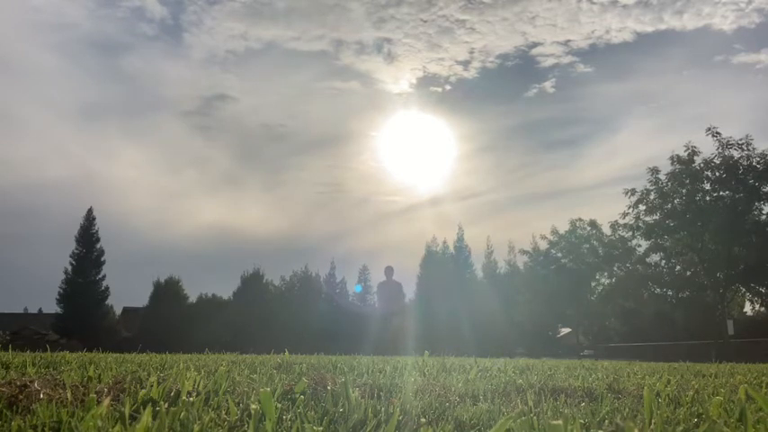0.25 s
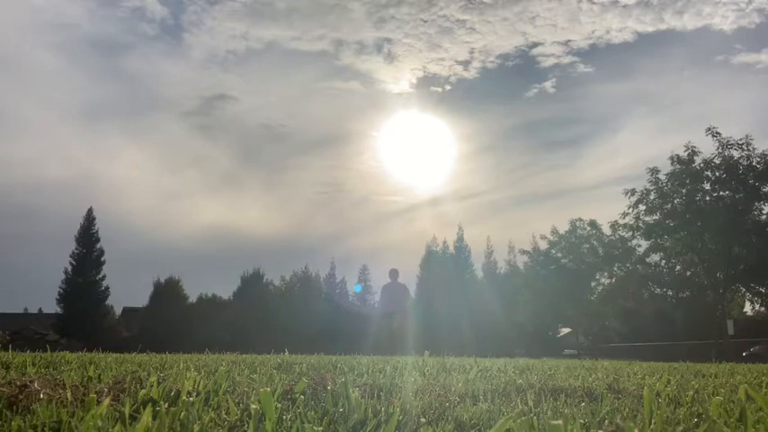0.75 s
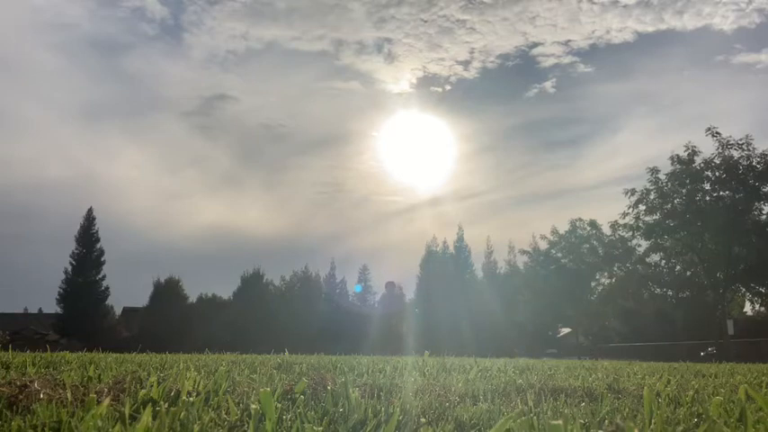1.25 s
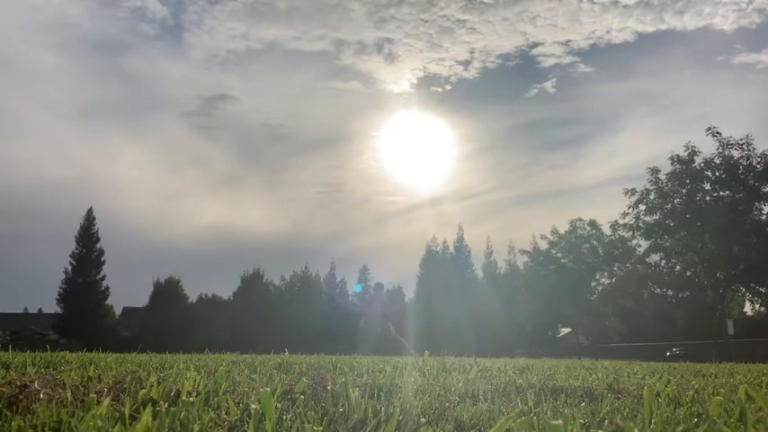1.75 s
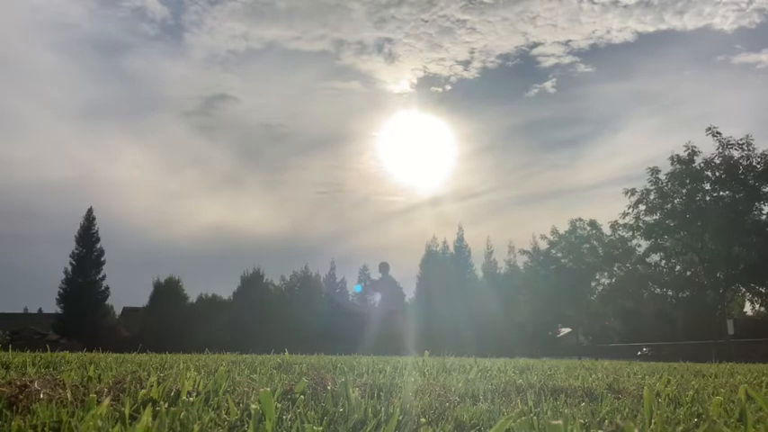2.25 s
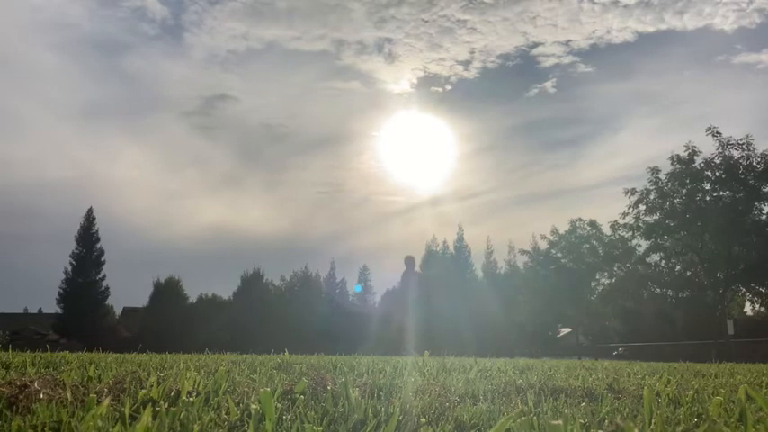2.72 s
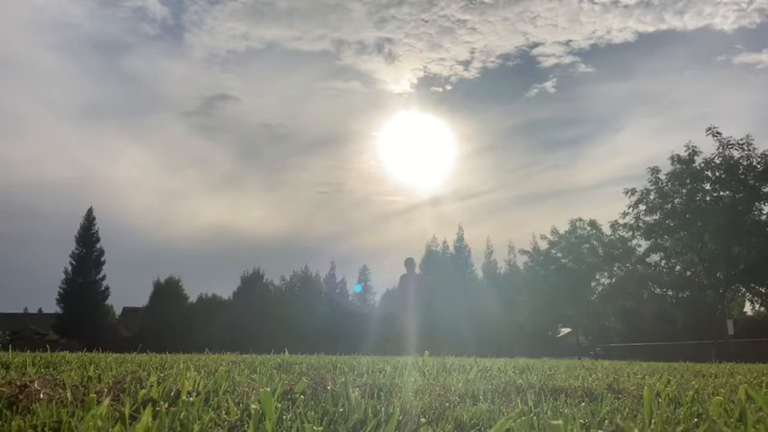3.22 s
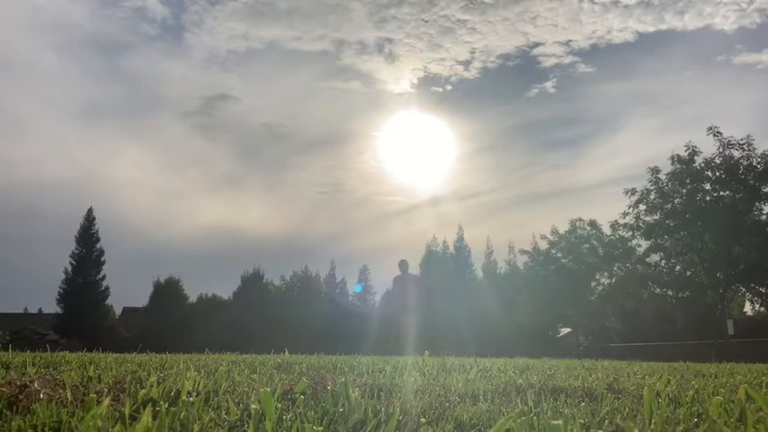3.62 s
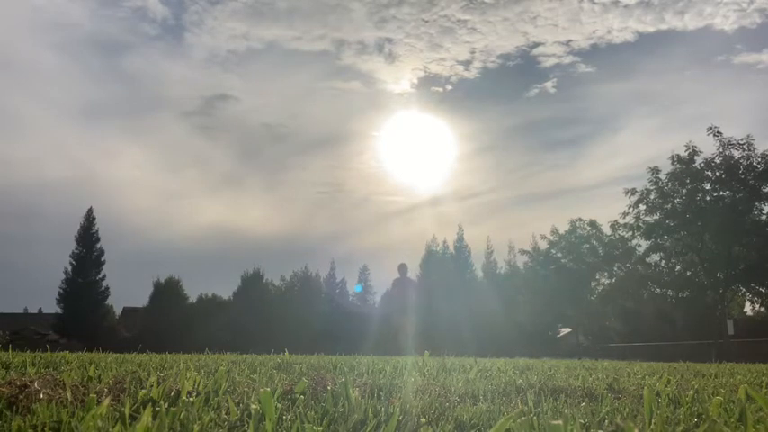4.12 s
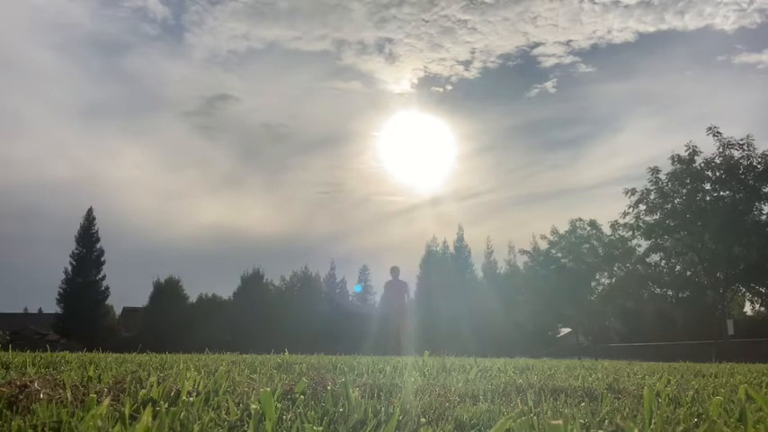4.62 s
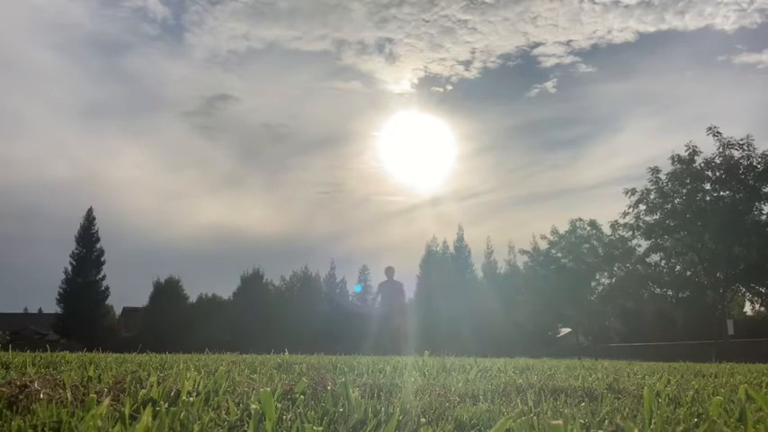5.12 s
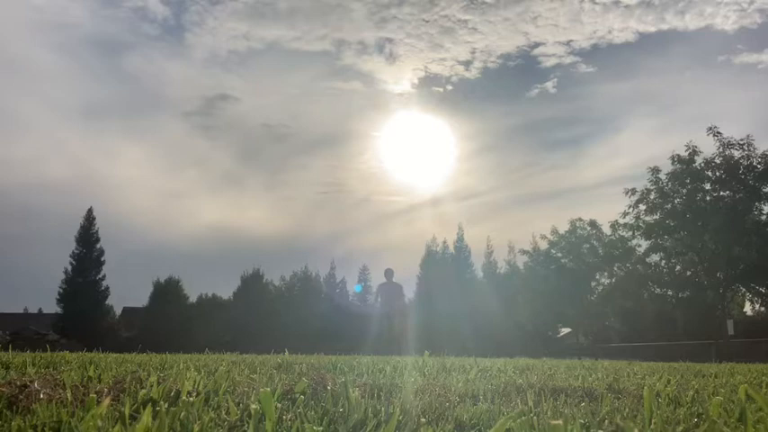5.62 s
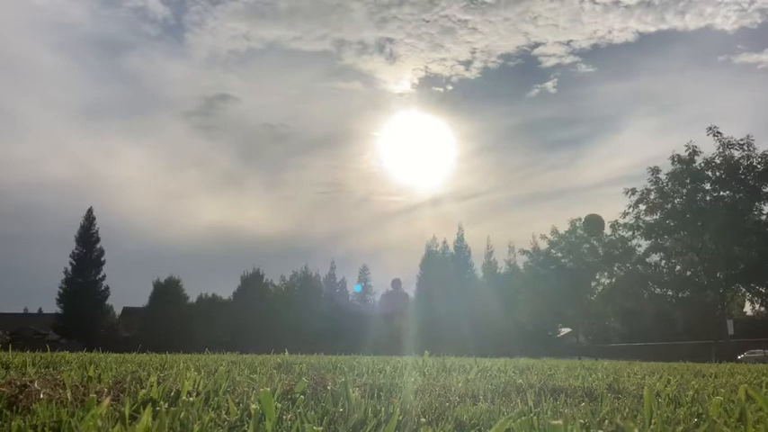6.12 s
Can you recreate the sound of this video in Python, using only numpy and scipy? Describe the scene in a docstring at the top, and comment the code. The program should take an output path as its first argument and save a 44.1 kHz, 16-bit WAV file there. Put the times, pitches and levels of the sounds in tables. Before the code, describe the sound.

Over dull distant traffic and a wavering engine drone, two sharp metallic bat hits ring out, with balls thumping turf and one brushing grass.

```python
"""A lawn edged with trees and houses, heard from down in the grass: a metal bat hits two balls.
Each hit is a noisy crack plus ringing barrel tones, and delayed noise brings it back from trees and walls.
Balls thump on the turf as tones that drop in pitch; one brushes close by as shaped noise with blade snaps.
Distant traffic (dull noise), an engine drone (two wavering tones) and a faint hiss run throughout."""
import sys
import numpy as np
from scipy import signal
from scipy.fft import rfft, irfft
from scipy.io import wavfile

SR = 44100
rng = np.random.default_rng(int(sys.argv[2]) if len(sys.argv) > 2 else 0)


def wav_record(signal):
    """Record a signal, one row per channel, as 16-bit PCM in the file named by sys.argv[1]."""
    frames = np.transpose(np.atleast_2d(signal))
    bounded = np.clip(frames, -1, 1)
    # unit amplitude maps onto the largest positive 16-bit level
    quanta = np.round(bounded * 32767).astype(np.int16)
    wavfile.write(sys.argv[1], SR, quanta)


N = 280917  # length of the scene (samples)
T = np.arange(N) / SR  # time of every sample (s)
BINS = np.fft.rfftfreq(4096, 1 / SR)  # frequencies at which the crack is built (Hz)
HALVES = np.array([[.5], [-.5]])  # splits a left-right difference evenly between the sides


def amp(db):
    """Turns decibels into a gain."""
    return 10 ** (np.asarray(db) / 20)


def unit(x):
    """Scales a sound to an rms of 1."""
    return x / np.sqrt(np.mean(x ** 2) + 1e-20)


def read(points, hz):
    """Reads a curve between its points, along a logarithmic frequency axis."""
    f, value = np.transpose(points)
    return np.interp(np.log(hz + 1), np.log(f + 1), value)


def follow(rows):
    """Reads a curve of time at every sample."""
    return np.interp(T, *np.transpose(rows))


def pan(db):
    """Gives left and right gains for a level difference in dB."""
    return amp(db * HALVES)


def add(mix, s, sound):
    """Adds a sound to the mix at time s, cutting off whatever runs past the end."""
    start = max(round(s * SR), 0)
    part = mix[:, start:][:, :sound.shape[-1]]
    part += sound[..., :part.shape[1]]


def colour(x, points):
    """Makes each frequency louder or softer by a curve in dB."""
    hz = np.fft.rfftfreq(x.shape[-1], 1 / SR)
    return irfft(rfft(x) * amp(read(points, hz)), x.shape[-1])


def causal(db):
    """Builds the minimum-phase response: these gains, with the energy as early as possible."""
    log_gain = np.log(amp(np.r_[db, db[-2:0:-1]]))
    return np.exp(np.conj(signal.hilbert(log_gain)))[:len(db)]


def drift(hz):
    """Makes a random wander of rms 1 that changes at rates up to about hz."""
    f = np.fft.rfftfreq(N, 1 / SR)
    return unit(irfft(rfft(rng.standard_normal(N)) / (1 + (f / hz) ** 4), N))


# How far the left of the two microphone ports leads the right
# (frequency [Hz], lead [radians])
PORT_LEAD = [(20, 0), (140, -.35), (240, -1.4), (600, -2.6), (1500, -3.2), (2500, -6.2), (4000, -6.3),
             (5700, -9.4), (7400, -6.3), (9400, -3.1), (11250, 0), (13100, 3.1), (15000, 6.3), (16000, 7)]


def ports(noise, likeness=.85):
    """Blends two unrelated noises into one sound that reaches two ports with a phase lead on the left."""
    hz = np.fft.rfftfreq(noise.shape[1], 1 / SR)
    a, b = rfft(noise)
    same = np.clip(likeness, 0, 1)
    blend = same * a + np.sqrt(1 - same ** 2) * b
    right = blend * np.exp(-1j * read(PORT_LEAD, hz))
    return irfft([a, right], noise.shape[1])


def hiss(level_db=-85):
    """The microphone's own faint, steady noise, nearly alike on both sides."""
    noise = ports(rng.standard_normal((2, N)), likeness=0.96)
    tone = [(1000, -2.0), (8000, -2.5), (14500, -1.0), (16000, -10.5)]  # (Hz, dB)
    return amp(level_db) * unit(colour(noise, tone))


# Tone of the distant traffic: mostly bass (frequency [Hz], relative level [dB])
RUMBLE_TONE = [(20, -35), (36, -15), (58, -3.5), (90, -3.5), (160, -4.5), (290, -5.5), (480, -6),
               (700, -12), (880, -12.5), (1250, -24), (1600, -32.5), (2100, -48.5), (3600, -52.5),
               (6000, -61), (16000, -78)]
# How alike the traffic is on the left and right (frequency [Hz], likeness [0-1])
RUMBLE_LIKENESS = [(60, 0.96), (130, 0.72), (230, 1), (420, 0.92), (800, 0.81), (1200, 0.5), (1800, 0.05),
                   (4000, 0.075), (8000, 0.731)]
# How much louder the traffic is on the left (frequency [Hz], left-right level [dB])
RUMBLE_LEAN = [(60, 3.5), (120, -1), (220, 5), (400, 1.5), (800, 0.5), (1300, 2), (2600, 0), (6000, -2)]
RUMBLE_DB = -39.5  # middle level, around which the traffic swells


def traffic(swell_db=1.08):
    """Far roads blur into a wide, dull wash of noise, heard differently at the two ports."""
    hz = np.fft.rfftfreq(N, 1 / SR)
    pair = rfft(ports(rng.standard_normal((2, N)), read(RUMBLE_LIKENESS, hz)))
    tone_db = read(RUMBLE_TONE, hz) + read(RUMBLE_LEAN, hz) * HALVES
    wash = unit(irfft(pair * amp(tone_db), N))
    return wash * amp(RUMBLE_DB + swell_db * drift(3.9))


# Engine's firing tone as it drifts in and out, before trim and throb (time [s], level [dB])
DRONE_LEVEL = [(0.0, -49.5), (0.68, -49.5), (0.76, -56.5), (1.44, -39.5), (2.64, -44), (2.8, -54.5),
               (2.96, -42.5), (3.52, -55.5), (3.64, -43.5), (3.8, -51.5), (4.4, -42), (4.6, -44.5),
               (4.68, -53.5), (5.64, -38.5), (5.88, -47.0), (5.96, -38.5), (6.2, -36.0), (6.37, -40)]
# Its third harmonic, before trim and throb (time [s], level [dB])
DRONE_THIRD_LEVEL = [(0.0, -49.0), (1.36, -48.5), (1.56, -58.5), (2.2, -49.5), (2.32, -61.5), (3.32, -52.5),
                     (3.6, -45.0), (4.68, -53.0), (5.48, -49.5), (6.24, -56.5), (6.37, -50.5)]
DRONE_HZ, DRONE_SAG_HZ_PER_S = 78.4, 1.22  # starting pitch and even slowing, before the waver


def engine(firing_db=0.0, third_db=-1.0, waver=.025, throb_db=2):
    """A far engine drones on its firing tone and third harmonic, wavering in the moving air."""
    pitch = (DRONE_HZ - DRONE_SAG_HZ_PER_S * T) * (1 + waver * drift(11))
    turns = np.cumsum(pitch) / SR
    firing_level = amp(follow(DRONE_LEVEL) + firing_db + throb_db * drift(12.0))
    third_level = amp(follow(DRONE_THIRD_LEVEL) + third_db + throb_db * drift(15))
    firing = firing_level * np.sin(2 * np.pi * turns)
    third = third_level * np.sin(2 * np.pi * 3 * turns)
    return np.sqrt(2) * (pan(0.18) * firing + pan(9) * third)  # root 2: levels are rms


BRUSH_START_S, BRUSH_END_S = 3.195, 4.9  # the grass is touched, and is still again
# Levels of the push, before the brush trim and flutter
SLIDE_DB, SLIDE_FALL_DB_PER_S = -36.5, 48  # the push dies away as the ball slows
SHOVE_S, SHOVE_DB, SHOVE_WIDTH_S = 3.256, -33, 0.042  # the shove on top of the slide
SETTLE_DB, SETTLE_FALL_DB_PER_S = -71, 8  # bent blades go on creeping back


def push():
    """Force on the grass in dB: one shove on top of a slide that dies away, then slow settling."""
    age = np.maximum(T - BRUSH_START_S, 0)
    shove = amp(SHOVE_DB) * np.exp(-((T - SHOVE_S) / SHOVE_WIDTH_S) ** 2)
    slide = amp(SLIDE_DB - SLIDE_FALL_DB_PER_S * age)
    settle = amp(SETTLE_DB - SETTLE_FALL_DB_PER_S * age)
    return 20 * np.log10(shove + np.hypot(slide, settle))


# Single blades snapping back, before trim and soft start (time [s], level [dB])
BLADE_SNAPS = [(3.1966, -38), (3.2357, -20), (3.241, -16), (3.282, -21.5), (3.4286, -38), (3.468, -40),
               (3.5045, -38.5), (3.565, -34.5), (3.6524, -43.5), (3.713, -52.5), (3.7773, -52),
               (3.8492, -54), (3.932, -56), (4.0058, -51.5), (4.0447, -56)]
SNAP_RISE_S = 0.00054
# A snap at the reference level falls 60 dB in this time; one weaker by the doubling step takes twice as long
SNAP_T60_S, SNAP_REF_DB, SNAP_DOUBLING_DB = 0.044, -24, 28


def snaps(snap_db=-3):
    """Loudness of the blades snapping back: strong ones are crisp, weak ones linger."""
    out = np.zeros((1, N))
    t = np.arange(SR // 5) / SR
    rise = 1 - np.exp(-t / SNAP_RISE_S)
    for s, db in BLADE_SNAPS:
        t60 = SNAP_T60_S * 2 ** ((SNAP_REF_DB - db) / SNAP_DOUBLING_DB)
        add(out, s, amp(db + snap_db - 60 * t / t60) * rise)
    return out


# Tone of firmly pushed or snapping blades (frequency [Hz], relative level [dB])
GRASS_FIRM_TONE = [(300, -31), (700, 4.5), (1300, -7), (2200, -17), (3000, -17), (4000, -6.5),
                   (4900, -12.5), (7800, -9), (9600, -8), (11200, -0.5), (13000, -1.5), (14500, -3.5),
                   (16000, 1)]
# Tone of barely touched blades (frequency [Hz], relative level [dB])
GRASS_LIGHT_TONE = [(1500, -10), (2700, -26), (3400, -1.5), (3700, -3), (4000, 5), (4400, -2), (5200, -2.5),
                    (6200, -16.5), (8000, -21), (11200, -24), (16000, -20)]


def grass(brush_db=-0.5, grain_db=1.5, flutter_db=2.55, swish_db=-77.5, swish_rise=.64,
          light_db=-80, firm_db=-60):
    """Blades swish softly at any touch; a firm push adds countless bright slips, and single blades snap back."""
    slips = ports(rng.standard_normal((2, N))) * amp(grain_db * drift(900))
    firm = unit(colour(slips, GRASS_FIRM_TONE))
    light_grain = amp(grain_db * (drift(300) + 0.84 * drift(25)))
    touches = ports(rng.standard_normal((2, N)), likeness=0.15) * light_grain
    light = unit(colour(touches, GRASS_LIGHT_TONE))
    push_db = push() + flutter_db * drift(60)
    # 0 for the lightest touch, 1 for a firm push
    firmness = np.clip((push_db - light_db) / (firm_db - light_db), 0, 1)
    touching = (T > BRUSH_START_S) & (T < BRUSH_END_S)
    brush = touching * amp(push_db + brush_db)
    swish = touching * amp(swish_db + swish_rise * (push_db - light_db))
    firm_level = np.sqrt(firmness * brush ** 2 + snaps() ** 2)  # their powers add
    return firm * firm_level + light * swish


# Balls landing on the turf (time [s], pock pitch [Hz], pock level [dB], thud pitch [Hz], thud level [dB],
# grass crunch level [dB], left ear's lag [s])
BALL_LANDINGS = [(.9575, 1118, -34, 297, -27.5, -59, 0.000089),
                 (1.7048, 794, -22, 254, -29, -42.5, 0.000046), (1.736, 740, -42.5, 260, -49, -51, .00005),
                 (5.9057, 1290, -22.5, 289, -6, -42.5, 0.00048)]


def landings(sink_s=.0054, rebound_s=0.016, rebound_hz=100, rebound_db=-17):
    """A ball crushes the blades; its hollow pock drops into a thud as it sinks into the soil."""
    out = np.zeros((2, N))
    crunch_tone = [(1000, 6.0), (5000, 5.5), (8000, 2.5), (16000, -4.5)]  # (Hz, dB)
    for s, pock_hz, pock_db, thud_hz, thud_db, crunch_db, lag in BALL_LANDINGS:
        # time around the impact, one row for each side
        t = np.arange(-SR // 50, SR // 6) / SR - lag * HALVES
        pock, thud, rebound = amp(pock_db), amp(thud_db), amp(thud_db + rebound_db)
        # stages of one bounce: (s, Hz, size)
        stages = [
            (-.7 * sink_s, pock_hz, 0),
            (-.2 * sink_s, pock_hz, pock),
            (.2 * sink_s, .85 * pock_hz, pock),
            (.5 * sink_s, 1.4 * thud_hz, thud / 2),
            (sink_s, thud_hz, thud),
            (1.4 * sink_s, .9 * thud_hz, .6 * thud),
            (1.9 * sink_s, .8 * thud_hz, rebound / 2),
            (rebound_s, rebound_hz, rebound),
            (1.7 * rebound_s, rebound_hz, 0)]
        when, hz, size = np.transpose(stages)
        pitch = np.interp(t, when, hz) * (t > when[0])
        body = np.interp(t, when, size) * np.sin(2 * np.pi * np.cumsum(pitch, 1) / SR)
        # the crunch peaks 2 ms early, rising 60 dB in 6 ms and falling 60 dB in 45 ms
        crush = amp(-60 * np.maximum((t + .002) / .045, -(t + .002) / .006))
        crackle = unit(colour(ports(rng.standard_normal(t.shape)), crunch_tone))
        crunch = amp(crunch_db) * crush * crackle
        add(out, s + t.mean(0)[0], body + crunch)
    return out


TREE_RISE = .25  # sets the build-up time of a stand's return, as a share of its delay


def stand(t, delay, db, depth, t60):
    """Power returned by one stand of trees: it builds up, holds through the stand's depth and dies away."""
    early = np.maximum(delay - t, 0) / (TREE_RISE * delay)
    late = np.maximum(t - delay - depth, 0)
    return amp(db - 60 * late / t60) ** 2 * np.exp(-np.pi * early)


# Stands of trees that scatter the blow back
# (delay [s], relative level [dB], depth [s], time to fall 60 dB [s])
TREE_STANDS = [(.026, -0.5, 0.0051, 0.15), (.128, -11.5, 0.069, .42), (.5, -32.5, .03, .7)]
# Single echoes from fences and houses, before the echo trim
# (delay [s], relative level [dB], left-right level [dB])
WALL_ECHOES = [(0.0248, -18.5, 5), (0.0677, -29, 0.5), (0.1438, -28.5, -4.5), (.179, -33, 15),
               (.214, -38, 10.5), (.492, -41.5, 0)]
# Tone of everything that comes back (frequency [Hz], relative level [dB])
RETURN_TONE = [(200, -18), (1500, -24), (2400, -15.5), (3200, -18.5), (3600, -21), (4300, -12.5),
               (4950, -5), (5300, 2.5), (5800, -6.5), (6350, 0), (7300, -9.5), (7900, 2.5), (8900, -15),
               (16000, -20.5)]


def surroundings(x, trees_db=-12.5, echoes_db=3.0, smear_s=.003, clump_db=3.5):
    """Trees scatter the sound back in clumps, and a few rough walls return it as brief, smeared echoes."""
    t = np.arange(SR) / SR
    clumps = amp(clump_db * drift(150)[:SR])
    level = np.sqrt(sum(stand(t, *row) for row in TREE_STANDS)) * clumps
    scatter = ports(rng.standard_normal((2, SR))) * level
    taps = amp(trees_db) * scatter / np.linalg.norm(scatter[0])
    for delay, db, side_db in WALL_ECHOES:
        wall = ports(rng.standard_normal((2, SR))) * np.exp(-t / smear_s)
        wall = wall / np.linalg.norm(wall[0])
        add(taps, delay, amp(db + echoes_db) * pan(side_db) * wall)
    response = colour(taps, RETURN_TONE)[:, :SR * 7 // 8]
    return signal.fftconvolve(x[:1], response, axes=1)[:, :N]


# Crack of ball on barrel, by where the ball strikes
# (frequency [Hz], level on the sweet spot [dB], level off it [dB], left-right level [dB])
CRACK_TONE = [(60, 0, -7, -0.5), (166.7, 13, 19, 1), (374.3, 23, 22, 3), (735, 28, 23.5, -3.5),
              (910, 22, 31.5, -0.5), (1280, 27.5, 23, 9), (2110, 10.5, 10, 2), (2620, 12, 14, -9),
              (3448, 23, 21.5, -5.5), (4200, 7.5, 7.5, -2), (5570, 11.5, 14.5, 1.5), (7817, 6, 3, -6),
              (9500, 1, -3.5, -3.5), (11200, 7, -2.5, 0.5), (16000, -1.5, -2, 0)]
# Barrel's ringing tones, before the grip damps them
# (frequency [Hz], level on the sweet spot [dB], level off it [dB], time to fall 60 dB [s],
# left-right level [dB])
BARREL_MODES = [(1510, -17, -17.5, .2, 10), (2490, -30, -21, .09, -2), (3607, -18, -17.5, .15, -3),
                (3490, -20, -11, .022, -8), (4325, -37, -26, .085, 1), (5044, -46, -34, .08, 0),
                (5340, -37, -35, .1, 2), (5540, -25, -15, .035, -8), (6500, -40, -30, .05, 0),
                (7950, -46, -40, .08, 0)]
GRIP_S = .05  # the hands choke the ring in about this time


def clink(level_db, off_centre, scatter_t60, ground_s=0.0044, ground_hz=1300, scatter_hz=4000,
          ring_db=0, rise_s=0.0012):
    """The ball cracks on the barrel, whose modes then ring until the grip damps them."""
    t = np.arange(SR // 3) / SR
    sweet, off, side = (read(np.array(CRACK_TONE)[:, [0, k]], BINS) for k in range(1, 4))
    # skimming over soft turf, the bass arrives a few milliseconds after the treble
    late = ground_s / (1 + BINS / ground_hz)
    delay_phase = np.exp(-2j * np.pi * np.cumsum(late) * BINS[1])
    response = causal(sweet + off_centre * (off - sweet)) * delay_phase
    response = response * amp(side * HALVES)
    # the bass comes straight through the grass; the treble is scattered into a short rasp
    straight = 1 / (1 + (BINS / scatter_hz) ** 2)  # share of the power
    lead = np.exp(1j * read(PORT_LEAD, BINS) * HALVES)
    direct = irfft(response * lead * np.sqrt(straight))[:, :len(BINS)]
    scattered = irfft(response * np.sqrt(1 - straight))[:, :len(BINS)]
    rasp = ports(rng.standard_normal((2, len(t))), likeness=.9) * amp(-60 * t / scatter_t60)
    rasp = rasp / np.linalg.norm(rasp[0])
    crack = signal.fftconvolve(rasp, scattered, axes=1)[:, :len(t)]
    add(crack, 0, direct)
    # the ring starts softly and is choked by the hands
    held = amp(ring_db) * (1 - np.exp(-t / rise_s)) * np.exp(-(t / GRIP_S) ** 2)
    ring = np.zeros_like(crack)
    for hz, sweet_db, off_db, t60, side_db in BARREL_MODES:
        phase = read(PORT_LEAD, hz) * HALVES
        db = sweet_db + off_centre * (off_db - sweet_db) - 60 * t / t60
        ring += pan(side_db) * amp(db) * held * np.sin(2 * np.pi * hz * t + phase)
    return amp(level_db) * crack, amp(level_db) * ring


# Blows of the bat (time [s], relative level [dB], distance from the sweet spot [0-1],
# time for the scattered crack to fall 60 dB [s], level sent to the surroundings [dB])
BAT_BLOWS = [(.6579, 0, 0, .024, 0), (5.7788, 0, 0.93, .045, -1)]


def bat(far_ring_db=-4):
    """Both blows with their echoes, which carry more of the crack than of the ring."""
    near, far = np.zeros((2, 2, N))
    for s, level_db, off_centre, scatter_t60, sent_db in BAT_BLOWS:
        crack, ring = clink(level_db, np.clip(off_centre, 0, 1), scatter_t60)
        add(near, s, crack + ring)
        add(far, s, amp(sent_db) * (crack + amp(far_ring_db) * ring))
    return near + surroundings(far)


def scene():
    """Adds up everything heard on the lawn, from the background to the bat."""
    return hiss() + traffic() + engine() + grass() + landings() + bat()


EDGE_HZ = 15850  # the sound is cut off above this


def record(dry):
    """Rounds off peaks near full scale, then filters out the highest treble."""
    held = dry / (1 + dry ** 6) ** (1 / 6)
    low_pass = signal.firwin(511, EDGE_HZ, window=("kaiser", 9), fs=SR)
    return signal.oaconvolve(held, low_pass[None], "same")


dry = scene()
out = record(dry)
wav_record(out)
```